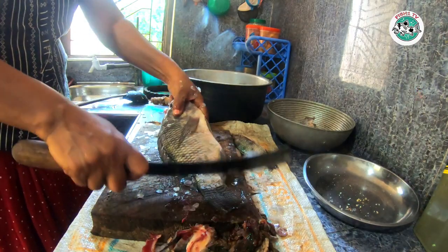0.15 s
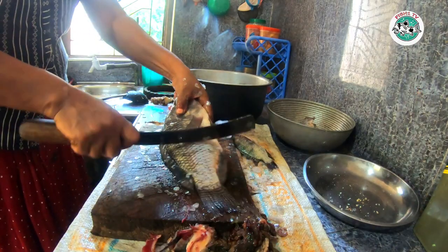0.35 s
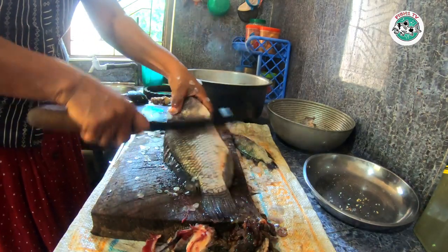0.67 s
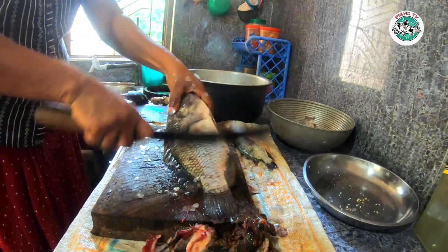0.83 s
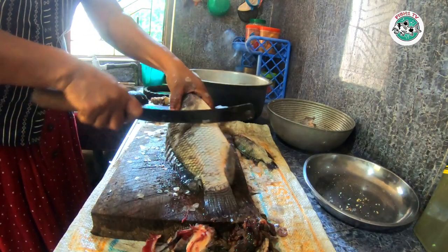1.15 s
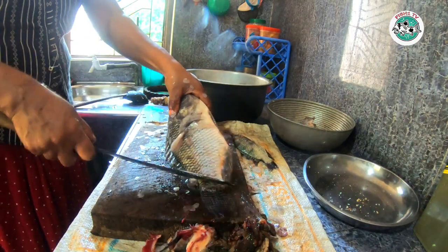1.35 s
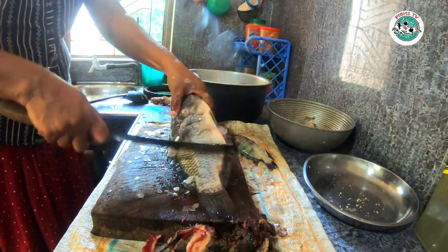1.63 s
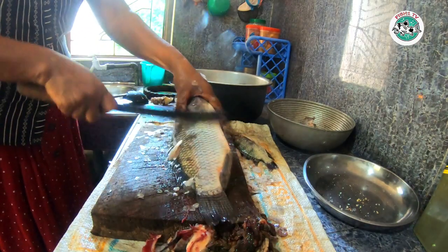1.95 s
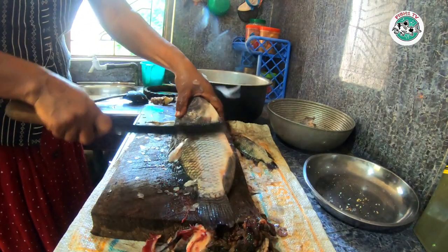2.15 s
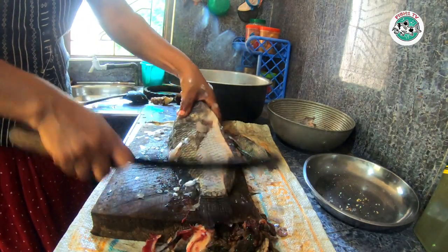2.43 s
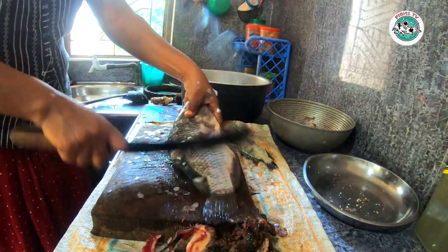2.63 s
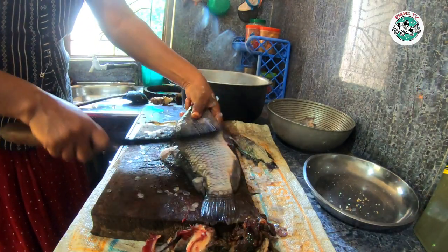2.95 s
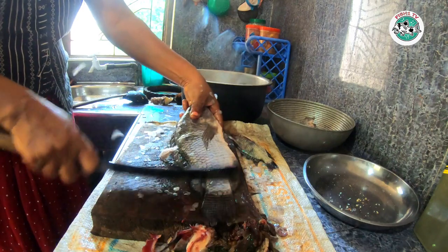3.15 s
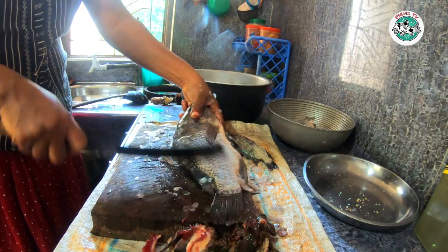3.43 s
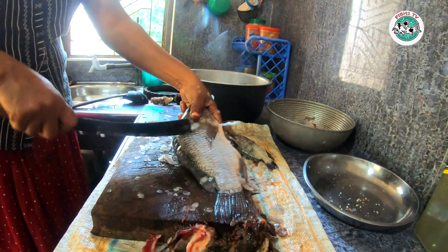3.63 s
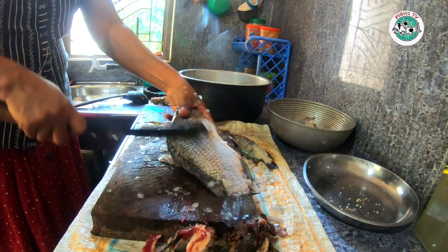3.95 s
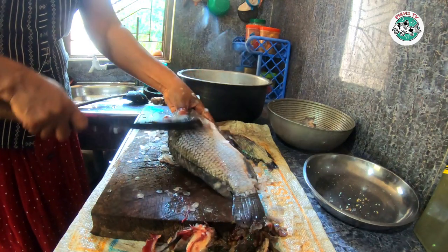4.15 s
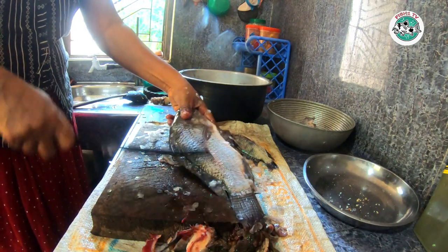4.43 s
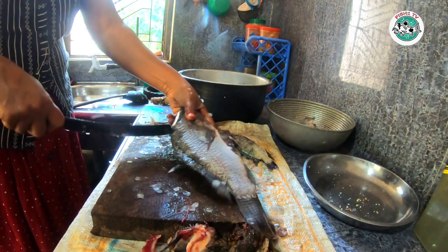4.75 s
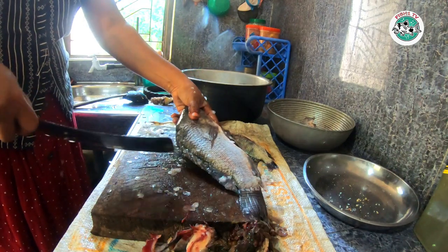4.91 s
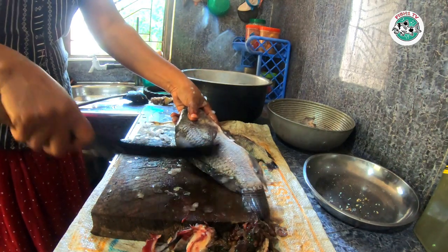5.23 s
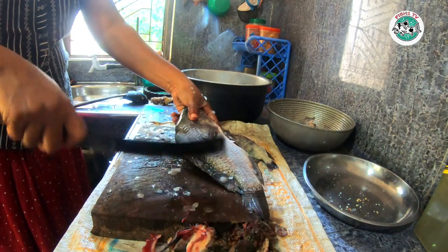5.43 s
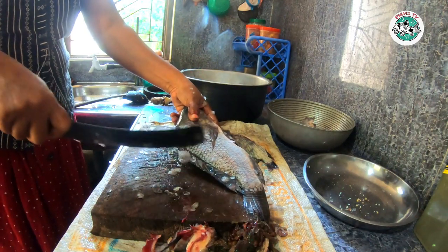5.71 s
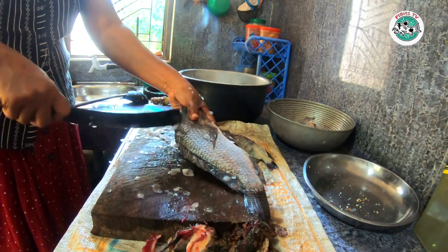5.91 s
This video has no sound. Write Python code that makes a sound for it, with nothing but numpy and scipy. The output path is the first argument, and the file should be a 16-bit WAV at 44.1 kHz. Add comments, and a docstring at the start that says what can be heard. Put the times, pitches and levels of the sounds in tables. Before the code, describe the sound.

A soft, steady room hush and a barely audible steel brush open the scene. From 0.3 s a long knife scales a large fish close by, about three strokes a second: short, dry, clumped crackling rasps with airy fizz, each swelling quickly and cutting off into a few loose ticks. Stiff scales snap sharply, notably around 0.65, 0.9 and 2 s. Lighter brushes fill the gaps. Under the strokes the wooden board thuds, the table booms faintly and wet flesh slaps softly. The edge chirrs near 0.9 s and squeaks thinly elsewhere. A faint rising bird call comes at 2.5 s. A strong scrape at 3.3 s fades as it goes; strokes at 3.9 to 4.3 s are shorter. At 4.7 s the blade knocks the board, rings briefly and chatters. After a gap, longer, lighter, fizzier scrapes run from 5.25 s to about 6 s, with a fainter bird at 5.4 s. Hard walls add short, bright reflections.

```python
"""A steady hush and a light brush of steel, then a long knife scales a large fish, about three strokes a second.
Strokes and brushes are shaped clumped crackle, split into rasp and fizz; stiff scales snap as short rings.
Noise and crackle through resonances make the thudding board, booming table and squeaking edge; slaps are swelling
sines. The blade knocks the board once, ringing its modes. Decaying noise is the tiled walls' answer.
A far bird calls twice as gliding sines."""
import sys
import numpy as np
from scipy import signal
from scipy.fft import rfft, irfft, next_fast_len
from scipy.io import wavfile
from scipy.ndimage import uniform_filter1d, map_coordinates

SR = 44100
rng = np.random.default_rng(int(sys.argv[2]) if len(sys.argv) > 2 else 0)


def persist_wave(psi):
    """Save psi, clipped to +-1, as 16-bit WAV."""
    counts = np.round(np.clip(psi, -1, 1) * 32767).astype(np.int16)
    wavfile.write(sys.argv[1], SR, np.atleast_2d(counts).T)


N = 267687


def amp(db):
    """Decibels to gain."""
    return 10 ** (np.asarray(db) / 20)


def unit(x):
    """Scale to rms 1."""
    return x / np.sqrt(np.mean(x ** 2) + 1e-20)


def along(points, hz):
    """Interpolate (frequency [Hz], value) points on a log frequency axis."""
    f, v = np.transpose(points)
    return np.interp(np.log(hz + 1), np.log(f + 1), v)


def wobble(knots_per_s):
    """A smooth random curve through normally distributed knots."""
    knots = rng.standard_normal(int(N * knots_per_s / SR) + 4)
    return map_coordinates(knots, [np.arange(N) * knots_per_s / SR])


def filtered(x, response):
    """Multiply the spectrum of x by a response of frequency."""
    size = x.shape[-1]
    m = next_fast_len(size + 8192)
    return irfft(rfft(x, m) * response(np.fft.rfftfreq(m, 1 / SR)), m)[..., :size]


def resonate(x, modes):
    """Pass x through parallel resonances of alternating sign: (centre [Hz], width [Hz], level [dB])."""
    def response(f):
        total = 0
        for k, (centre, width, db) in enumerate(modes):
            damping = 1j * f * width
            total = total + (-1) ** k * amp(db) * damping / (centre * centre - f * f + damping)
        return total
    return filtered(x, response)


def stereo(pair, alike):
    """Mix two unrelated signals to left and right with a given likeness per frequency."""
    def mid_side(hz):
        turn = np.arccos(np.clip(along(alike, hz), -1, 1)) / 2
        return np.array([np.cos(turn), np.sin(turn)])
    mid, side = filtered(pair, mid_side)
    return np.array([mid + side, mid - side])


def add(track, s, sound):
    """Lay a sound into a track, in place, at s seconds."""
    room = track[..., max(round(s * SR), 0):][..., :sound.shape[-1]]
    room += sound[..., :room.shape[-1]]


def crackle(rate, spread_db):
    """Two unrelated streams of tiny fractures of uneven size, rate per second, rms 1."""
    hits = rng.random((2, N)) < rate / SR
    sizes = amp(spread_db * np.minimum(rng.exponential(size=(2, N)), 4))
    return unit(hits * sizes * rng.choice([-1, 1], (2, N)))


def patchy(x, depth_db, size):
    """Random gain patches in pitch and time; size sets their length in samples."""
    z = signal.stft(x, nperseg=size)[2]
    field = rng.standard_normal(z.shape[1:])
    for axis in (0, 1):
        field = uniform_filter1d(field, size=4, axis=axis)
    return signal.istft(z * amp(depth_db * unit(field)), nperseg=size)[1][:, :N]


def gesture(s, length, rise, fall):
    """Gain that builds up to s, holds for length seconds and dies away."""
    t = np.arange(N) / SR - s
    return np.exp(np.minimum(t, 0) / rise - np.maximum(t - length, 0) / fall)


def together(gains):
    """Joint gain of overlapping, unrelated movements."""
    return np.sqrt(np.sum(np.square(gains), axis=0))


# hush spectrum: (frequency [Hz], relative density [dB/Hz])
HUSH_SPECTRUM = [(15, -41), (25, -12.5), (108, -27), (141, -4.5), (263, -12), (301, -3.5), (326, -18.5),
                 (394, -7.5), (503, -19), (641, -18.5), (734, -18), (2480, -17.5), (3080, -18.5),
                 (8360, -25.5), (16000, -75)]
# hush stereo: (frequency [Hz], left-right likeness [1])
HUSH_ALIKE = [(60, 0.79), (180, 0.83), (550, 0.39), (1650, 0.21), (4970, 0.55), (15000, 0.25)]
HUSH_DB = -55.5


def air():
    """The hush of house and yard: shaped noise whose level drifts slightly."""
    noise = stereo(rng.standard_normal((2, N)), HUSH_ALIKE)
    hush = filtered(noise, lambda hz: amp(along(HUSH_SPECTRUM, hz)))
    return amp(HUSH_DB + 0.2 * wobble(3.64)) * unit(hush)


# wall decay: (frequency [Hz], t60 [s])
WALL_T60 = [(150, 0.55), (400, 0.15), (1200, 0.25), (3000, 0.24), (8000, 0.3), (14000, 0.19)]
# wall stereo: (frequency [Hz], left-right likeness [1])
WALL_ALIKE = [(150, 0.96), (1000, 0.2), (3000, 0.43), (7000, 0.046)]


def kitchen(x, wet_db):
    """The walls' answer: decaying noise tails that crossfade each half second as the knife moves about."""
    out, clock = np.zeros((2, N)), np.arange(N) / SR
    for centre_s in np.arange(14) / 2:
        hz, t, z = signal.stft(rng.standard_normal((2, SR // 2)), SR, nperseg=256)
        t60 = np.maximum(along(WALL_T60, hz), .02)[:, None]
        tail = signal.istft(z * amp(-60 * t / t60), SR, nperseg=256)[1]
        delayed = np.pad(tail, ((0, 0), (SR // 300, 0)))
        tail = stereo(delayed, WALL_ALIKE)
        share = 1 - 2 * abs(clock - centre_s)
        part = (x.mean(axis=0) * share)[share > 0]
        answer = signal.fftconvolve(part[None], tail / np.linalg.norm(tail[0]), axes=1)
        add(out, max(centre_s - .5, 0), answer)
    return amp(wet_db) * out


# bird calls: (time [s], level [dB], start pitch [Hz], end pitch [Hz], length [s])
BIRD_CALLS = [(2.501, -50, 5500, 6060, 0.077), (5.44, -58, 5370, 5700, 0.087)]


def bird():
    """Thin rising sines from outside the window, their pitch blurred by distance."""
    out = np.zeros((2, N))
    for s, db, start_hz, end_hz, length in BIRD_CALLS:
        u = np.linspace(0, 1, int(length * SR))
        smear = np.array([wobble(1500)[:len(u)] for side in range(2)])  # many echoes, unlike at each side
        pitch = start_hz + (end_hz - start_hz) * u + 550 * smear
        phase = 2 * np.pi * np.cumsum(pitch, axis=1) / SR
        add(out, s, amp(db) * np.sin(np.pi * u) * np.sin(phase))
    return out


PRESS_S, EASE_S = 0.035, 0.03  # heaviest push: build, ease
LEAN_DB, LEAN_S, SETTLE_S = -10.5, 0.025, 0.079  # lighter weight around it: level, rise, settling of the fish


def pressing(s, length, delay):
    """Gain of the hand's weight: it leans on the fish through the stroke and pushes hardest once."""
    t = np.arange(N) / SR - s - delay
    push = np.exp(-(t / np.where(t < 0, PRESS_S, EASE_S)) ** 2)
    return np.maximum(push, amp(LEAN_DB) * gesture(s, length, LEAN_S, SETTLE_S))


# board resonances: (centre [Hz], width [Hz], relative level [dB])
BOARD_MODES = [(209, 41, -4.5), (280, 64, -3.5), (417, 210, -8), (543, 125, -2), (863, 186, -6)]
# table resonances: (centre [Hz], width [Hz], relative level [dB])
TABLE_MODES = [(81, 7, 1.5), (118, 9.1, -9), (151, 13, -11.5), (212.6, 7, -5.5)]
# fish rocking under hard pushes: (time [s], length [s], relative level [dB])
FISH_ROCKS = [(0.285, 0.044, -36), (.93, .02, -62), (1.423, 0.077, -40), (2.562, 0.22, -48),
              (2.985, 0.038, -46.5), (3.286, 0.085, -45), (3.574, .015, -50.5), (3.868, 0.027, -50),
              (4.726, 0.038, -43), (5.225, 0.052, -54)]
ROCK_RISE_S, ROCK_FALL_S = 0.0093, 0.023
BRUSH_THUD_DB, BRUSH_HOLLOW_DB = -12.5, -7  # thud over the brush's rasp, hollow knock over that thud


def board():
    """The tugging blade shakes the board; hard pushes rock the fish and set the table booming."""
    presses = []
    for s, length, *_, delay, thud_db, hollow_db in STROKE_TIMELINE:
        presses.append((amp(thud_db) * pressing(s, length, delay), hollow_db))
    for s, length, db, fizz_db in BRUSH_TIMELINE:
        press = amp(db + BRUSH_THUD_DB) * gesture(s, length, PRESS_S, EASE_S)
        presses.append((press, BRUSH_HOLLOW_DB))
    thud_gain = together([gain for gain, hollow_db in presses])
    hollow_gain = together([gain * amp(hollow_db) for gain, hollow_db in presses])

    tugs = stereo(crackle(rate=700, spread_db=3), [(200, 1.0), (800, 0.71)])
    body = filtered(resonate(tugs, BOARD_MODES), lambda hz: 1 / (1 + (hz / 1300) ** 4))
    low = filtered(body, lambda hz: 1 / (1 + (hz / 450) ** 8))
    tilt = amp([[-2.2], [1.7]])  # left, right
    shake = thud_gain * unit(low) * tilt + hollow_gain * unit(body - low)

    rocks = [amp(db) * gesture(s, length, ROCK_RISE_S, ROCK_FALL_S) for s, length, db in FISH_ROCKS]
    push = together(rocks)
    boom = resonate(stereo(rng.standard_normal((2, N)), [(100, 0.68)]), TABLE_MODES)
    boom = unit(filtered(boom, lambda hz: 1 / (1 + (hz / 330) ** 6)))
    return amp(-2.0) * (shake + push * boom)


# fish slapping and settling: (time [s], level before stereo tilt [dB], pitch [Hz], swell time [s])
FISH_SLAPS = [(0.274, -37, 83, 0.0079), (.285, -37.5, 212.7, .029), (.65, -42.5, 213.5, 0.017),
              (.755, -48, 217, 0.0094), (.903, -40.5, 239, .011), (1.139, -41.5, 226, 0.017),
              (1.411, -55, 81, 0.029), (1.426, -44.5, 216, 0.023), (1.515, -42, 590, 0.009),
              (1.533, -39.5, 280.4, 0.024), (1.746, -45.5, 251.2, 0.028), (3.288, -40.5, 115, .023),
              (3.338, -43, 596, 0.013), (3.344, -40.5, 308, .012), (3.618, -40.5, 570, 0.0074),
              (3.873, -36.5, 261, 0.013), (3.876, -40, 551, 0.008), (4.098, -47, 630, 0.007),
              (4.105, -40, 287, 0.0065), (4.306, -42, 232, 0.0092), (4.75, -50, 81, 0.016),
              (4.761, -44.5, 212, 0.02), (4.802, -41.5, 566, .004), (5.324, -45, 208, 0.019),
              (5.968, -45, 760, 0.0064)]


def thuds():
    """Soft flesh lands gently: one mode of the fish, board or table swells and dies."""
    out, t = np.zeros((2, N)), np.arange(SR // 3) / SR
    for s, db, hz, swell_s in FISH_SLAPS:
        phase = 2 * np.pi * hz * t + 0.37 * wobble(65)[:len(t)]
        swell = t / swell_s * np.exp(1 - t / swell_s)
        add(out, s, amp(db) * swell * np.sin(phase))
    return out * amp([[-1.7], [1.3]])


# blade striking the board and bouncing: (time [s], relative level [dB])
BLADE_CONTACTS = [(4.6985, -7), (4.703, -15), (4.7085, -17), (4.7226, -13), (4.7342, -28)]
# blade and board struck together: (frequency [Hz], relative level [dB], t60 [s])
STRUCK_MODES = [(544, -23, 0.41), (676, -7, 0.043), (845, -6.5, 0.11), (873, -15.5, 0.2), (1360, -22, 0.24),
                (1480, -29, .14), (1537, -1.5, 0.19), (1587, 2, 0.065), (1728, -7, 0.16), (1781, -9.5, .19),
                (2270, -16, .09), (2970, -6.5, 0.035), (3397, -17, .12), (3830, -16, .04), (4700, -28, .04)]


def knock(ring_db=-26, clack_db=-8, clack_s=0.0015, spread_db=1.3):
    """The blade hits the board and chatters: the first blow rings it, each contact adds a short hard clack."""
    out, t = np.zeros((2, N)), np.arange(SR // 3) / SR
    onset = 1 - np.exp(-t / 0.00057)

    def modes():
        total = 0
        for hz, db, t60 in STRUCK_MODES:
            level = db + spread_db * rng.standard_normal((2, 1))
            total = total + amp(level - 60 * t / t60) * np.sin(2 * np.pi * hz * t)
        return onset * total

    add(out, BLADE_CONTACTS[0][0], amp(ring_db) * modes())
    for s, db in BLADE_CONTACTS:
        add(out, s, amp(db + clack_db) * modes() * np.exp(-t / clack_s))
    return out


# edge squeaking and chirring on wet skin: (time [s], level before envelope [dB], pitch [Hz], width [Hz], fade [s])
EDGE_SQUEALS = [(0.498, -35.5, 9860, 700, .013), (.503, -33, 8260, 70, 0.011),
                (0.74, -47.5, 2480, 600, .046), (0.886, -31.5, 2340, 1000, 0.03),
                (0.926, -38.5, 1430, 250, .024), (2.143, -43.5, 3700, 1000, 0.033),
                (2.377, -41, 5000, 2190, 0.014), (2.591, -49, 3250, 400, 0.17),
                (3.934, -35, 1500, 400, .012), (4.333, -40, 2500, 300, 0.0098),
                (4.637, -46, 2260, 800, 0.11), (5.258, -44, 2950, 600, 0.046),
                (5.337, -39, 7760, 400, 0.058), (5.681, -35.5, 7820, 250, 0.029),
                (5.899, -35.5, 8750, 600, .025), (5.956, -34.5, 8100, 400, 0.018)]


def squeals():
    """Fast stick and slip of the edge, as noise, excites one narrow resonance."""
    out, t = np.zeros((2, N)), np.arange(SR // 4) / SR
    for s, db, hz, width, fade_s in EDGE_SQUEALS:
        slips = stereo(rng.standard_normal((2, len(t))), SCRAPE_STEREO)
        narrow = resonate(slips, [(hz, width, 0)])
        tone = unit(resonate(narrow, [(hz, 3 * width, 0)]))
        envelope = (1 - np.exp(-t / 0.00067)) * np.exp(-(t / fade_s) ** 2)
        add(out, s, amp(db) * tone * envelope)
    return out


# stiffest scales letting go: (time [s], relative level [dB], pitch [Hz])
SCALE_SNAPS = [(0.3178, -22, 8350), (0.3462, -5.5, 2700), (0.3736, -17, 3280), (0.3816, -6, 2620),
               (.5822, -29, 2670), (.6059, -6, 3100), (0.6277, -12, 4450), (0.6523, -1, 2080),
               (0.6667, 0, 6400), (0.8827, 1, 2840), (0.8909, -13, 3110), (0.9304, -9.5, 2990),
               (1.1283, -8, 2720), (1.1361, -5.5, 2200), (1.1897, -13.5, 5500), (1.493, -24, 2860),
               (1.5163, -7, 9000), (1.7344, -8.5, 2620), (1.765, -21, 7570), (1.983, 2.5, 4300),
               (1.9873, 0.5, 8400), (1.994, -3, 6700), (2.0439, -1.5, 1970), (2.0452, -3, 6200),
               (2.2573, -4.5, 5250), (2.313, -5.5, 2400), (2.3452, -11, 2650), (2.6758, -5, 6500),
               (2.682, -2, 7760), (2.7458, -7, 2000), (2.9662, -18, 7200), (3.024, -7, 2780),
               (3.301, -9, 3300), (3.3247, -12, 3140), (3.901, -11, 7620), (3.9358, -15, 1730),
               (4.117, -5.5, 3800), (4.3363, -11, 2580), (5.6073, -12, 1700), (5.6272, -12.5, 4240)]
# snap treble roll-off: (frequency [Hz], relative gain [dB])
SNAP_ROLLOFF = [(60, -33), (9000, 1.5), (10500, 1), (11500, -10), (14000, -18), (16000, -18)]


def snaps(cycles=1.8, crack=0.088, lead_s=.0008):
    """A stiff scale lets go with a cycle or two of ring and a short crack, a little to one side."""
    out, t = np.zeros((2, N)), np.arange(SR // 100) / SR
    for s, db, hz in SCALE_SNAPS:
        sides = np.maximum(t - rng.uniform(0, 4e-5, (2, 1)), 0)  # small arrival delays
        ring = np.sin(2 * np.pi * hz * sides) * np.exp(-sides * hz / cycles)
        tear = crack * rng.standard_normal(len(t)) * amp(-60 * t / 0.012)
        add(out, s + lead_s, amp(db) * (ring + tear))
    return filtered(out, lambda hz: amp(along(SNAP_ROLLOFF, hz) - 4.0) * hz ** 2 / (hz ** 2 + 900 ** 2))


def release(depth_db=4, hold_s=0.0035, surge_s=0.016):
    """The edge stalls on a stiff scale just before it snaps, then lurches on: a gain curve in dB."""
    lurch, t = np.zeros(N), np.arange(SR // 20) / SR
    shape = np.concatenate([-np.exp(-t[::-1] / hold_s), 0.2 * np.exp(-t / surge_s)])
    for s, db, hz in SCALE_SNAPS:
        add(lurch, s - t[-1], shape)
    return depth_db * np.clip(lurch, -1, 1)


SKIM_DB, SKIM_S = -7.5, .02  # just before the bite: level, rise
BITE_S, LIFT_S = 0.0048, 0.019  # tearing: attack, release
TRAIL_DB, TRAIL_S = -12.5, 0.064  # loose scales after the lift: level, decay


def tearing(s, length, swell_db):
    """Gain of one pass of the edge: skim, bite, a swelling or fading tear, lift and trail."""
    t = np.arange(N) / SR - s
    tear = gesture(s, length, BITE_S, LIFT_S)
    graze = amp(np.where(t < 0, SKIM_DB, TRAIL_DB)) * gesture(s, length, SKIM_S, TRAIL_S)
    return amp(swell_db * np.clip(t / length, 0, 1)) * np.maximum(tear, graze)


# strokes against the scales: (time [s], length [s], rasp at the bite before stall and lurch [dB],
# swell along the stroke [dB], fizz over rasp [dB], delay of the heaviest push [s],
# relative thud [dB], hollow knock over thud [dB])
STROKE_TIMELINE = [(0.319, 0.064, -33.5, 5, -3, 0.045, -44.5, -9),
                   (0.6, 0.07, -37.5, 8.5, 0, 0.046, -44, 1), (0.89, 0.045, -38, 4.5, 3.5, 0.034, -42, 0),
                   (1.136, 0.054, -39.5, 3, -2, 0.019, -45.5, -3),
                   (1.49, 0.053, -39.5, 5.5, 1, 0.038, -41.5, -1.5),
                   (1.743, 0.024, -38.5, 8.5, -5, 0.021, -44, -3),
                   (1.975, 0.072, -38.5, 6, -1.5, 0.088, -51.5, -1.5),
                   (2.252, 0.072, -38.5, 5.5, -1.5, 0.012, -54.5, -2),
                   (2.665, 0.083, -38.5, 2.5, 3, 0.022, -48, 3.5),
                   (2.962, 0.098, -44, 5.5, 3.5, 0.085, -53.5, 5.5),
                   (3.294, 0.092, -35.5, -8.5, -1.5, .058, -42, -6),
                   (3.579, 0.078, -48, 5, 2.5, 0.069, -44.5, -2),
                   (3.899, 0.036, -34, -2.5, -4.5, .006, -41, -5.5),
                   (4.109, 0.041, -38.5, 1, 0, .002, -47.5, 0.5),
                   (4.326, 0.014, -38.5, -0.5, -4.5, .001, -48.5, -5),
                   (4.695, 0.019, -39.5, 7, -3.5, 0.031, -46, 8),
                   (5.255, 0.14, -45, -9.5, 3.5, 0.082, -55.5, 4),
                   (5.605, .048, -38.5, -3, 0, 0.039, -48, 0.5),
                   (5.908, 0.1, -41.5, -9.5, 3, 0.087, -49, 2.5)]
# light brushes between strokes: (time [s], length [s], rasp before stall and lurch [dB], fizz over rasp [dB])
BRUSH_TIMELINE = [(0.053, 0.014, -59, 7), (0.266, 0.047, -51.5, -3), (0.503, 0.018, -52.5, 5),
                   (0.741, 0.04, -47.5, 11), (0.799, 0.046, -48.5, 5.5), (1.212, 0.068, -51, -1),
                  (1.362, 0.053, -56.5, -2), (1.603, .015, -47, -4), (1.797, .02, -42.5, -4),
                  (1.901, 0.011, -45.5, -8), (2.156, .06, -52.5, 10.5), (2.37, 0.012, -47.5, -23),
                  (2.593, 0.054, -50.5, 0), (2.821, 0.0098, -51.5, 8.5), (2.893, 0.012, -52, 3.5),
                  (3.435, 0.015, -54, 0), (3.85, 0.016, -44, 0.5), (3.992, 0.022, -53, -7),
                  (4.215, .04, -58, 1.5), (4.403, 0.018, -52, -2), (4.593, 0.034, -54, -3),
                  (4.651, 0.033, -51.5, 3.5), (4.874, 0.039, -53.5, -10), (5.563, 0.042, -51.5, -6),
                  (5.681, 0.015, -55.5, 7.5)]
# scrape spectrum: (frequency [Hz], relative gain [dB])
SCRAPE_SPECTRUM = [(80, -13.5), (470, -15), (800, -8.5), (1140, -10), (1210, -4.5), (2000, 0.5),
                   (2320, -0.5), (2570, 2), (3140, 0.5), (5110, -3), (5870, -2), (8230, 0), (10200, -8),
                   (11300, -21), (14100, -23), (16000, -51.5)]
# scrape stereo: (frequency [Hz], left-right likeness [1])
SCRAPE_STEREO = [(300, 0.27), (1500, 0.62), (3000, 0.91), (5000, 0.74), (8000, 0.14), (14000, 0.32)]


def scraping():
    """The edge rips through rows of scales: a clumped crackle, a rasp below and a fizz above."""
    passes = []
    for s, length, db, swell_db, fizz_db, *_ in STROKE_TIMELINE:
        passes.append((amp(db) * tearing(s, length, swell_db), fizz_db))
    for s, length, db, fizz_db in BRUSH_TIMELINE:
        passes.append((amp(db) * tearing(s, length, 0), fizz_db))
    rasp_gain = together([gain for gain, fizz_db in passes])
    fizz_gain = together([gain * amp(fizz_db) for gain, fizz_db in passes])

    # each row of scales gives way at once, then the tearing fades
    catches = abs(crackle(rate=160, spread_db=-1.0)[0])
    fade = np.exp(-np.arange(SR // 50) / SR / 0.0054)
    rows = 1 + 0.64 * unit(signal.fftconvolve(catches, fade)[:N])
    grains = crackle(rate=7600, spread_db=2.0) * rows
    grains = patchy(grains, depth_db=-0.96, size=96)  # each scale has its own colour
    grains = patchy(grains, depth_db=2.5, size=768)  # contact resonances shift along the stroke
    grains = filtered(stereo(grains, SCRAPE_STEREO), lambda hz: amp(along(SCRAPE_SPECTRUM, hz)))
    rasp = filtered(grains, lambda hz: 1 / (1 + (hz / 6500) ** 8))
    fizz = grains - rasp
    return amp(release()) * (rasp_gain * unit(rasp) + fizz_gain * unit(fizz))


def scene():
    """Knife, fish and board in the kitchen, with the hush and the bird."""
    work = scraping() + board() + bird() + squeals()
    cracks, clack, slaps = snaps(), knock(), thuds()
    sent = work + amp(3.5) * cracks + amp(6.5) * clack + amp(-15) * slaps  # share reaching the walls
    return work + cracks + clack + slaps + kitchen(sent, wet_db=-7.5) + air()


TOP_HZ = 15850


def record(dry):
    """Band limit: nothing passes from TOP_HZ up."""
    return filtered(dry, lambda hz: hz < TOP_HZ)


dry = scene()
out = record(dry)
persist_wave(out)
```